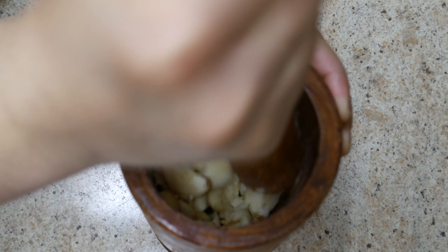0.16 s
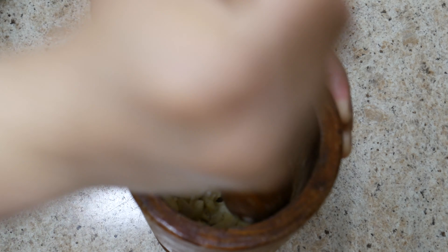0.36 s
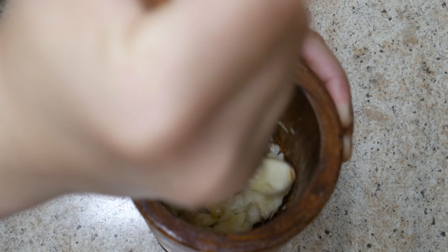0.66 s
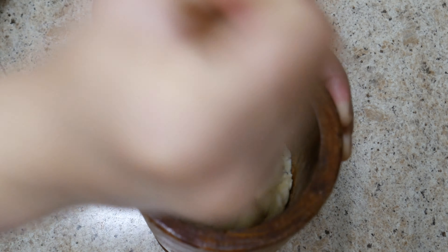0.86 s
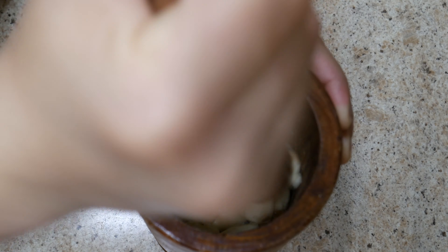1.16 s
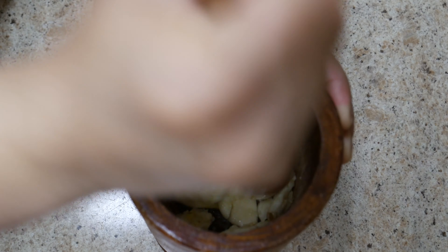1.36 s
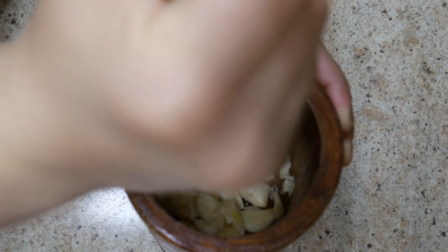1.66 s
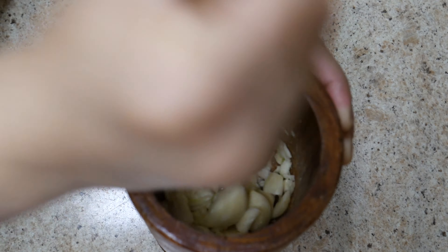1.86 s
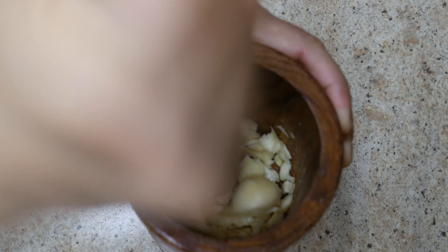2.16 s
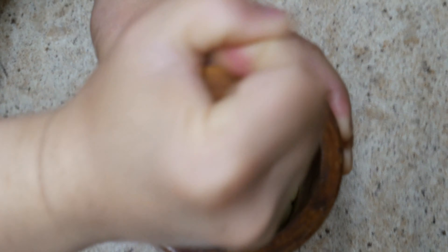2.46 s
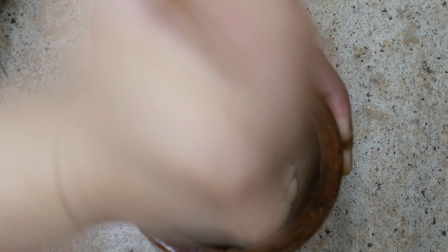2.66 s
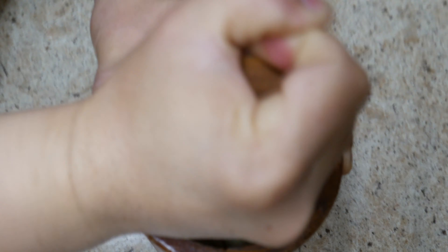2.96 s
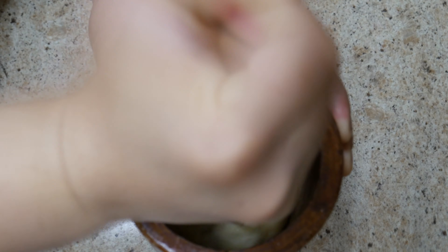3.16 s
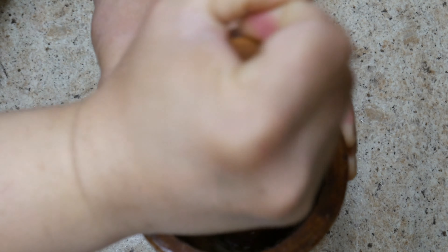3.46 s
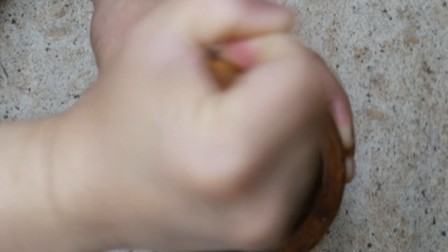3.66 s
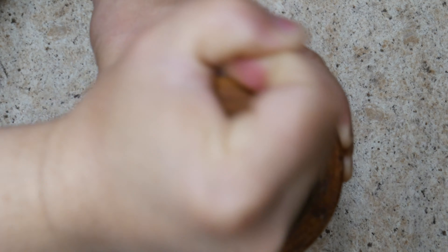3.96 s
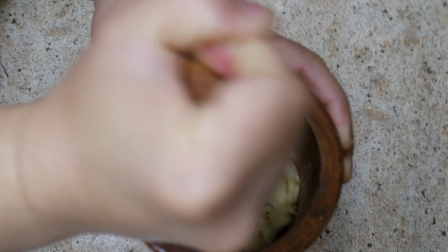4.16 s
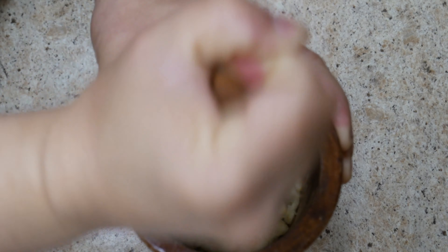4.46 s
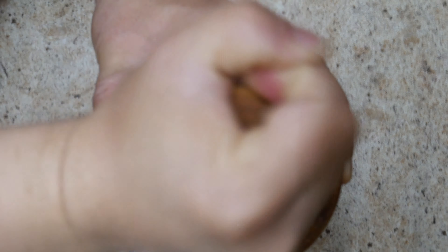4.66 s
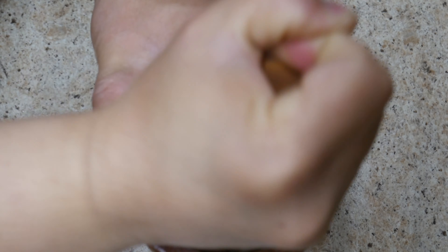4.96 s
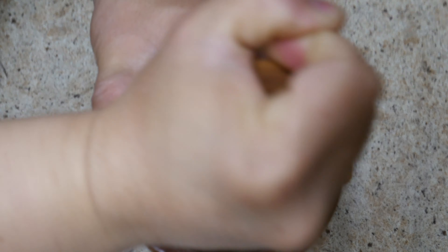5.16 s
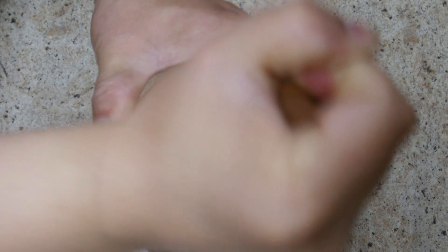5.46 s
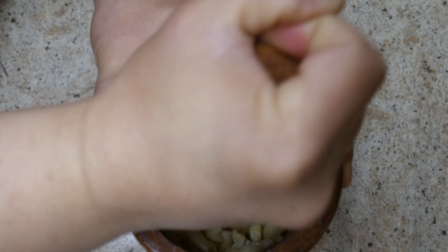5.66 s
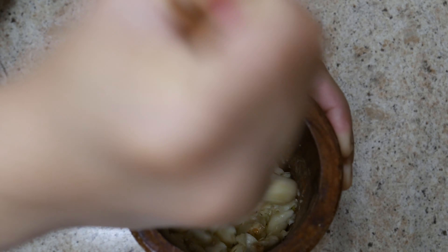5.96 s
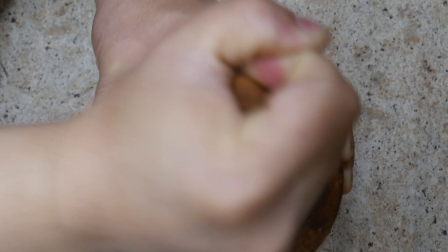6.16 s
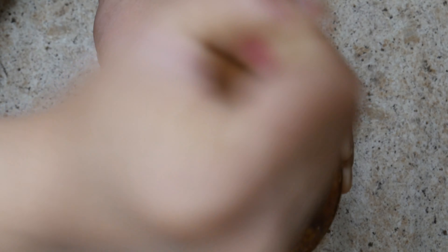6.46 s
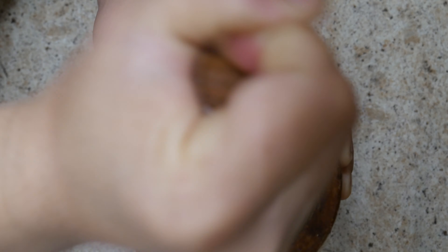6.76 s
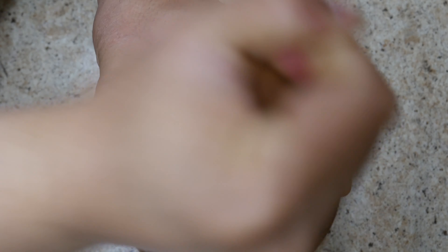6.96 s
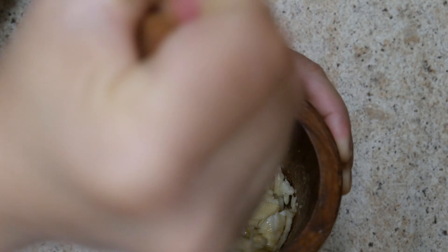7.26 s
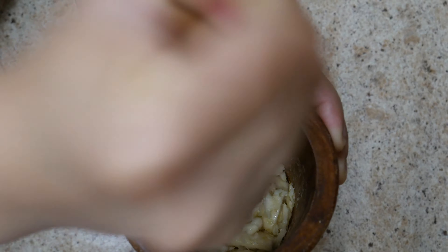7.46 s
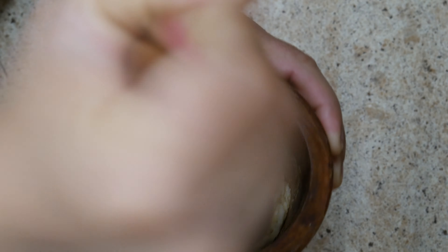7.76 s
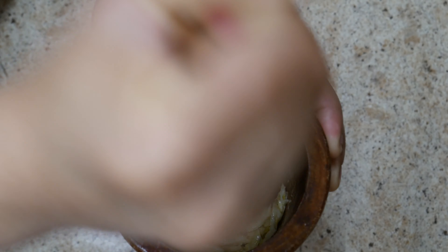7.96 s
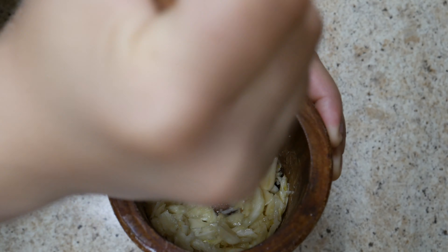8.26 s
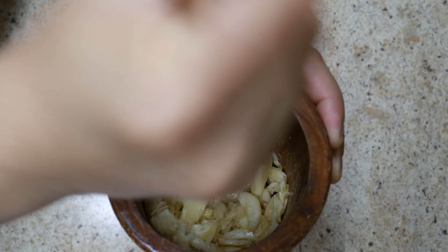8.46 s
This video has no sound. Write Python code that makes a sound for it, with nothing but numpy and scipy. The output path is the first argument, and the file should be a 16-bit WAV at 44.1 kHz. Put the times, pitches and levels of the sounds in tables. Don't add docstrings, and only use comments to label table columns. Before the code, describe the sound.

A wooden pestle pounds garlic in a wooden mortar, about four hard blows a second, crunching dry at first, then squelching wetly.

```python
import sys
import numpy as np
from scipy import signal
from scipy.fft import rfft, irfft
from scipy.io import wavfile
from scipy.ndimage import uniform_filter1d

SR = 44100
rng = np.random.default_rng(int(sys.argv[2]) if len(sys.argv) > 2 else 0)


def to_wav(s):
    ch = np.atleast_2d(s).T
    pcm = np.round(np.clip(ch, -1, 1) * 32767)
    wavfile.write(sys.argv[1], SR, pcm.astype(np.int16))


def to_linear_factor(level_db):
    exponent = np.asarray(level_db, float) / 20
    return 10 ** exponent


N = 379409
SPAN = np.arange(SR // 2) / SR


def add(track, s, piece, lead=0):
    at = int(s * SR) - lead + np.arange(len(piece))
    inside = (at >= 0) & (at < N)
    track[at[inside]] += piece[inside]


def ring(modes, push, db, scatter_db, detune):
    hz, mode_db, t60 = np.transpose(modes)[:, :, None]
    chance = rng.standard_normal((2, len(modes), 1))
    decay = to_linear_factor(mode_db + scatter_db * chance[1] - 60 * SPAN / t60)
    waves = np.sin(2 * np.pi * hz * (1 + detune * chance[0]) * SPAN) * decay
    sound = signal.fftconvolve(push, waves.sum(0))[:len(SPAN)]
    return to_linear_factor(db) * sound / np.abs(sound).max()


def resonate(x, peaks, order=1):
    y = 0
    for hz, width, db in peaks:
        b, a = signal.iirpeak(hz, hz / width, SR)
        y = y + to_linear_factor(db) * signal.sosfilt([[*b, *a]] * order, x)
    return y / y.std()


def colour(x, spectrum):
    hz, db = np.transpose(spectrum)
    f = np.log(np.arange(1, len(x) // 2 + 2) * SR / len(x))
    y = irfft(rfft(x) * to_linear_factor(np.interp(f, np.log(hz), db)), len(x))
    return y / y.std()


def grit(size, spread_db, grain_ms):
    k = max(int(grain_ms * SR / 1000), 1)
    strengths = to_linear_factor(spread_db * rng.exponential(size=size // k + 1))
    grains = np.repeat(strengths, k)[:size]
    return rng.standard_normal(size) * grains / np.sqrt(np.mean(grains ** 2))


def swell(rise_ms, fall_ms, lead, size=4096):
    ms = (np.arange(size) - lead) * 1000 / SR
    return to_linear_factor(-12 * np.where(ms < 0, -ms / rise_ms, ms / fall_ms))


# start_s [s], extra level_db [dB]
HOPS = [
    (.74, 4),
    (.99, 4),
    (1.74, 5),
    (4.42, 1.5),
    (6.11, 3),
    (7.1, 1.5),
    (7.58, 9),
    (8.57, 3),
]


def hop_db(s):
    return sum(db for at, db in HOPS if abs(at - s) < .05)


# frequency_hz [Hz], level_db [dB per Hz]
QUIET = [(12, -34), (20, 3.5), (45, -1.5), (168, -9.5), (499, -17), (574, -24.5), (1370, -33.5),
         (2080, -34.5), (8650, -44), (13500, -46), (16000, -65)]


def quiet_room():
    return to_linear_factor(-45) * colour(rng.standard_normal(N), QUIET)


# frequency_hz [Hz], level_db [dB], t60_s [s]
ROOM = [(120, -6.5, 0.42), (291, -3, 0.23), (454, -8, 0.48), (970, 0, 0.61), (2030, -20, 0.67),
        (3800, -6, 1), (8000, -11, 1), (13900, -8, 0.15)]
ROOM_MODAL_HZ = 700


def kitchen(x):
    out, paths = 0, 4
    turn = np.searchsorted(np.array(BLOWS)[:, 0] - .1, np.arange(N) / SR) % paths
    for path in range(paths):
        echo = 0
        for hz, db, t60 in [band for band in ROOM if band[0] < ROOM_MODAL_HZ]:
            tail = resonate(rng.standard_normal(len(SPAN)), [(hz, .7 * hz, 0)]) * to_linear_factor(-60 * SPAN / t60)
            onset = np.minimum(SPAN / 0.0015, 1)
            echo = echo + to_linear_factor(db) * np.sqrt(hz / SR) * tail * onset / np.sqrt(t60 * SR / 14)
        out = out + signal.oaconvolve(x * (turn == path), echo)[:N]
    haze = grit(N, .8, 2.5)
    thirds = [(hz * step, db, t60) for hz, db, t60 in ROOM if hz >= ROOM_MODAL_HZ for step in (.8, 1, 1.25)]
    for hz, db, t60 in thirds:
        keep = to_linear_factor(-120 / t60 / SR)
        band = signal.lfilter(*signal.iirpeak(hz, 6, SR), x)
        stored = signal.lfilter([1 - keep], [1, -keep], band ** 2)
        out = out + to_linear_factor(db - 9.0) * np.sqrt(stored) * resonate(haze, [(hz, hz / 4, 0)], order=2)
    return out


# frequency_hz [Hz], level_db [dB per Hz]
PASTE = [(590, -26), (1000, -11.5), (1610, -24), (1870, 1.5), (2470, -1.5), (4260, -2), (8750, -7.5),
         (14400, -20.5), (16000, -38.5)]
# frequency_hz [Hz], width_hz [Hz], level_db [dB]
HOLLOW = [(374, 347, 15.5), (610, 340, 3.5), (1010, 920, -15.5), (1945, 1300, -53)]
SQUELCH_DB, SQUELCH_PER_CRUNCH, DWELL_S = -45.5, 0.32, 0.14
WETTING_DB, WETTING_S = -2.5, 1.3
RATTLE_DB, RATTLE_PER_SLAP, RATTLE_PER_WALL = -31.5, 0.51, 0.19


def aftermath():
    wet, rattle = np.zeros(N), np.zeros(N)
    dwell = SPAN[SPAN < DWELL_S]
    release = np.minimum((dwell[-1] - dwell) / 0.044, 1)
    for blow, burst, contact in zip(BLOWS, CRUNCH, CONTACTS):
        s, _, slap_db, low_db, wall_db = blow
        paste_db = contact[-1] + SQUELCH_DB + SQUELCH_PER_CRUNCH * burst[1]
        paste_db += WETTING_DB * np.exp(-s / WETTING_S)
        rattle_db = RATTLE_DB + RATTLE_PER_SLAP * slap_db + RATTLE_PER_WALL * (low_db + wall_db)
        rattle_db += hop_db(s)
        squelch = to_linear_factor(paste_db + 5.0 - 60 * dwell) + to_linear_factor(paste_db + 18.5 - 990 * dwell)
        add(wet, s, squelch * release)
        add(rattle, s, to_linear_factor(rattle_db + 11.0 - 168.0 * SPAN) * np.minimum(SPAN / 0.0095, 1))
    squelching = colour(grit(N, 2.0, 1.2), PASTE) * wet
    return squelching + resonate(grit(N, 1.9, 3.0), HOLLOW, order=2) * rattle


# start_s [s], pitch_hz [Hz], level_db [dB], t60_s [s]
SINGS = [
    (1.49, 3600, -45, .45),
    (1.99, 2060, -43, .45),
    (3.2, 1950, -38, 0.38),
    (4.151, 1140, -28, 0.45),
    (6.86, 1930, -41, .4),
    (7.1, 760, -30, 0.59),
]


def sings():
    out = np.zeros(N)
    for s, hz, db, t60 in SINGS:
        blur = resonate(rng.standard_normal(len(SPAN)), [(hz, 70, 0), (hz * 0.94, 130, -5)], order=2)
        add(out, s, to_linear_factor(db - 2 - 60 * SPAN / t60) * blur)
    return out


# start_s [s], length_ms [ms], level_db [dB]
SQUEAKS = [
    (0.364, 36, -46),
    (5.125, 10, -55),
    (5.36, 13, -45),
    (3.404, 38, -27.5),
    (3.557, 23, -45),
    (5.599, 13, -32.5),
]
# start_s [s], length_ms [ms], level_db [dB]
WHISTLE = (.362, 37, -44.5)


def squeaks():
    rub, slip = np.zeros(N), np.zeros(N)
    for track, events in ((rub, SQUEAKS), (slip, [WHISTLE])):
        for s, ms, db in events:
            add(track, s, to_linear_factor(db) * signal.windows.tukey(int(ms * SR / 1000), .3))
    friction = grit(N, 2.2, 1.5)
    narrow = [(2290, 130, -2), (4880, 130, 0), (3900, 200, -8)]
    broad = [(2200, 320, 5.5), (4870, 360, 3), (5300, 1500, -3), (3920, 750, -4), (650, 420, 1),
             (6550, 4100, -15)]
    thin = resonate(rng.standard_normal(N), narrow, order=2) * slip
    return thin + resonate(friction, broad, order=2) * rub


# start_s [s], level_db [dB], centre_hz [Hz], length_ms [ms]
LIFTS = [(0.5475, -32.5, 4130, 19), (1.598, -41, 3760, 20), (1.826, -38.5, 5950, 8.2),
         (1.86, -44, 4170, 13), (2.356, -35, 2150, 14), (2.601, -36, 3540, 15), (3.095, -33, 4270, 17),
         (3.8044, -36, 3660, 16), (4.0586, -31, 2090, 10), (4.2547, -47, 3060, 14),
         (4.562, -34.5, 2170, 24), (5.1307, -47, 2240, 11), (5.955, -34.5, 3520, 17),
         (6.7318, -32, 3560, 8.8), (6.925, -32, 4350, 26), (7.2365, -39.5, 2090, 20),
         (7.6996, -33.5, 2040, 25), (7.735, -39, 3300, 10), (7.9194, -42, 3570, 13),
         (8.1635, -34.5, 2880, 14), (8.218, -35.5, 3540, 20), (8.471, -35.5, 3550, 15)]


def lifts():
    out = np.zeros(N)
    for s, db, hz, ms in LIFTS:
        peaks = [(hz, 900, 0), (2200, 900, -4), (5000, 7000, -6), (600, 700, -3)]
        smack = resonate(grit(4096, 1.2, 0.85), peaks, order=2)
        add(out, s, to_linear_factor(db - 10.0) * smack * swell(2.7, ms, 240), 256)
    return out


# start_s [s], level_db [dB],
# pitch_hz [Hz]
NUDGES = [
    (.31, -36, 700),
    (0.386, -24.5, 535),
    (5.134, -23, 520),
    (5.365, -25, 478),
    (3.434, -17, 490),
    (6.553, -30, 450),
    (7.06, -19, 650),
    (8.071, -33, 505),
]


def nudges():
    out = np.zeros(N)
    for s, db, hz in NUDGES:
        push = uniform_filter1d(grit(2048, 1.8, .6) * swell(5.1, 8.4, 280, size=2048), size=20)
        add(out, s, ring([(hz, 0, .04), (190, -4, .05), (800, -8, .03)], push, db, 1.5, 0.016), 256)
    return out


# start_s [s], bowl_db [dB], pestle_db and crack_db
# [dB above the bowl], level_db of the scrape that follows [dB]
KNOCKS = [(0.481, -17.5, -27, -5, -45), (0.973, -13.5, -21, -9.5, -36.5), (1.226, -17, -28, -13, -13),
          (1.977, -6.5, -20, -29, -37), (2.451, -20, -24, -18.5, -16), (2.693, -15.5, -29, -15, -17.5),
          (3.166, -17.5, 7.5, -13, -32.5), (3.357, -26, -11, -6, -24), (4.15, -4.5, 8.5, -4, -18),
          (4.365, -5, 1.5, -44, -16.5), (4.857, -10, -19, -34, -27), (5.062, -0.5, -7, -17.5, -26.5),
          (5.308, -3, -5.5, -14, -21), (5.526, -11, -6, -21, -16.5), (6.825, -20.5, 16, 8.5, -15),
          (7.029, -4.5, 2.5, -13.5, -18.5), (7.804, -34, 6, -8, -31), (8.278, -11, -3.5, -22, -24.5),
          (8.521, -10, 5, -15, -35)]
# frequency_hz [Hz], width_hz [Hz], level_db [dB]
CRACK = [(1950, 320, 14.5), (1644, 700, 18.5), (3120, 1860, 3), (4700, 2600, -7)]
TOUCH_LEAD_S, TOUCH_DB, TOUCH_PESTLE_DB, TOUCH_CRACK_DB, TOUCH_SCRAPE_DB = .014, -23.5, -29, -12, -34
TOUCH_DRY_DB, DRYING_S = 7.5, 3
KNOCK_RATTLE_DB, KNOCK_RATTLE_DB_PER_S = -23.5, 499


def knocks():
    out, slide, grind = np.zeros((3, N))
    landings = np.array(BLOWS)[:, 0]
    rim = np.array(KNOCKS)[:, 0]
    rim_modes = [(634, 0.0, 0.069), (252, -11, 0.12), (1160, -7, .03), (2200, -15, 0.014)] + BOWL_HIGH
    touches = []
    for s in landings[1:]:
        if not np.any((rim < s) & (rim > s - .12)):
            touch_db = TOUCH_DB + TOUCH_DRY_DB * np.exp(-s / DRYING_S)
            touches.append((s - TOUCH_LEAD_S, touch_db, TOUCH_PESTLE_DB, TOUCH_CRACK_DB, TOUCH_SCRAPE_DB))
    for s, db, pestle_db, crack_db, scrape_db in KNOCKS + touches:
        contact = grit(2048, 1.8, 0.59) + 4 * signal.unit_impulse(2048, 28)
        chatter = uniform_filter1d(contact * swell(0.5, 8, 28, size=2048), size=4)
        add(out, s, ring(rim_modes, chatter, db - 7.5, 3.1, 0.025), 32)
        add(out, s, ring(PESTLE, chatter, db + pestle_db - 7, 1.5, .015), 32)
        crack = resonate(chatter, CRACK, order=2)
        add(out, s, to_linear_factor(db + crack_db + 1.0) * crack / np.abs(crack).max(), 32)
        add(slide, s, to_linear_factor(db + KNOCK_RATTLE_DB - KNOCK_RATTLE_DB_PER_S * SPAN))
        way = landings[landings > s][0] - s
        to_go = 1 - SPAN[SPAN < way] / way
        add(slide, s, to_linear_factor(scrape_db - 7.5 - 10.0 * to_go))
        add(grind, s, to_linear_factor(scrape_db - 15.0 - 16.0 * to_go))
    body = [(620, 370, 5.5), (1025, 410, -5.0), (2240, 940, -11), (1455, 720, -16)]
    salt = [(4320, 2800, 8.5), (7800, 1700, 2.5)]
    rub = grit(N, 2.6, 2.5)
    return out + resonate(rub, body, order=2) * slide + resonate(rub, salt, order=2) * grind


# start_s of the peak [s], level_db [dB], tilt_db of low over high
# grit [dB], rise_ms [ms], fall_ms [ms]
CRUNCH_BURSTS = [(0.0092, -22, 10.5, 28, 9.1), (0.248, -17.5, -3.5, 2, 3.9), (0.4944, -21, 0, 4.5, 4.7),
                 (0.7389, -19, 9, 2.6, 8.3), (0.9834, -24, 7.5, 4.5, 7.1), (1.2419, -21.5, 9.5, 4.3, 7.6),
                 (1.4874, -12, -0.5, 2, 3.2), (1.736, -19, 4.5, 5, 4.6), (1.986, -13, 9.5, 4.3, 4.5),
                 (2.2263, -22.5, 0, 5.7, 11.4), (2.47, -20, -1.5, 4.6, 9), (2.7087, -16.5, 4.5, 3.7, 6.3),
                 (2.9552, -20.5, 4.5, 3.3, 10), (3.198, -16, 8.5, 3.8, 6), (3.4431, -20, 4.5, 24, 7.9),
                 (3.677, -15.5, -0.5, 3.5, 8.4), (3.925, -17.5, 3.5, 6, 9.8), (4.1749, -25.5, 3, 9.7, 14),
                 (4.4207, -15.5, 3.4, 2.9, 2.8), (4.6694, -16, 1.5, 6.3, 6.1), (4.911, -18, 9.9, 5.7, 7.7),
                (5.158, -16, 8.5, 2.4, 8.4), (5.3955, -16.5, 9, 3.8, 3.8), (5.632, -21, 1.2, 16, 9.8),
                (5.869, -22, 0.5, 12.3, 6.6), (6.1041, -14, 4.8, 4, 1.5), (6.3475, -11.5, 4, 1.7, 2.9),
                (6.6008, -14.5, 8.9, 2.3, 3.1), (6.86, -13.5, 8.2, 1.7, 3.4),
                (7.0973, -19.5, 5.5, 5.7, 8.5), (7.3422, -18.5, 8.2, 5.4, 8.5),
                (7.5827, -8.5, 5.6, 2, 0.46), (7.8388, -24.5, 6.3, 9.7, 13), (8.0864, -20.5, 9.1, 2, 12.4),
                (8.3396, -16.5, 3.9, 1.9, 6.6), (8.5687, -19, 3.5, 4.1, 6.3)]
CRUNCH = CRUNCH_BURSTS
# frequency_hz [Hz], width_hz [Hz], level_db [dB]
GRIT = [
    [(2088, 640, 6.5), (2660, 1450, 1.5), (1576, 1700, -4.5)],
    [(3750, 600, -9), (4320, 1000, -1.5), (4920, 2800, -8)],
    [(8150, 2550, 2), (7650, 2400, -12.5), (11350, 5500, -5)],
]


def crunch():
    out, lead = np.zeros(N), 2048
    for s, burst_db, tilt_db, rise_ms, fall_ms in CRUNCH:
        band_db = burst_db + np.array([tilt_db / 2, -0.3, -tilt_db / 2])
        shape = swell(rise_ms, fall_ms, lead) + to_linear_factor(-32.5) * swell(4.4, 28.0, lead)
        common = grit(4096, 1.1, .4)
        for peaks, db in zip(GRIT, band_db):
            shifted = []
            for (hz, width, peak_db), (u, v) in zip(peaks, rng.standard_normal((3, 2))):
                shifted.append((hz * (1 + 0.053 * u), width, peak_db + 2.0 * v))
            clumps = common + 1.3 * grit(4096, 3.2, 2.5)
            band = resonate(clumps * shape, shifted, order=2)
            loudest = np.sqrt(uniform_filter1d(band ** 2, size=100).max())
            add(out, s, to_linear_factor(db - 2.5) * band / loudest, lead)
    return out


# start_s [s], thud_db of the counter [dB], slap_db on the bottom [dB],
# low_db of the bowl ring [dB], wall_db of the wall ring [dB above the bowl ring]
PESTLE_BLOWS = [(0.0073, -32, -16, -18, -1), (0.2494, -18.5, -9.5, -15, -11), (0.4961, -17, -7.5, -16, -4.5),
                (0.7408, -17.5, -11, -15.5, -6), (0.9887, -18.5, -10, -11, -6.5),
                (1.244, -22, -9.5, -20, -2.5), (1.4884, -23, -17, -22.5, 0.5), (1.7383, -23, -10.5, -14, -6),
                (1.9847, -22, -19.5, -21, -4), (2.228, -15.5, -19.5, -14.5, -13),
                (2.4708, -16, -11.5, -17.5, -3.5), (2.7108, -20.5, -16.5, -13, -5),
                (2.9612, -15.5, -16, -17, -2.5), (3.2014, -28, -31, -18.5, -2),
                (3.4388, -24, -26, -11, -14.5), (3.678, -17.5, -19, -17.5, -5.5),
                (3.9276, -17.5, -18.5, -11, -16), (4.1765, -23.5, -21, -22, -12),
                (4.422, -14.5, -10, -9.5, -3.5), (4.672, -15, -22, -21, -0.5),
               (4.9136, -20, -9.5, -11.5, -18), (5.1611, -15.5, -13.5, -19, -4),
               (5.3976, -16, -16.5, -14.5, -5), (5.6321, -17, -21.5, -18, -3),
               (5.8673, -12.5, -13.5, -14, -12.5), (6.1054, -15, -6.5, -21.5, 5.5),
               (6.3489, -17, -24, -9.5, -4.5), (6.6016, -20, -15.5, -12.5, -11),
               (6.862, -17, -12, -14.5, 1.5), (7.0994, -20.5, -11, -15, 5.5), (7.344, -20, -17, -18, -11),
               (7.5839, -15, -6, -20, 5.5), (7.842, -20.5, -26, -21, -4.5), (8.0895, -15, -9.5, -18, 2.5),
               (8.3427, -15.5, -14.5, -23, 0), (8.5711, -16, -8, -19, -2)]
BLOWS = PESTLE_BLOWS
# start_s [s], grip_hz [Hz], wall_hz [Hz], chatter_ms [ms],
# level_db added to the squelch after it [dB]
CONTACTS = [(.007, 471, 660, 11, 3.5), (.249, 463, 600, 3, 0.5), (.496, 414, 740, 14, 0.5),
            (.741, 441, 638, 8.2, -1), (.989, 438, 595, 7.2, -2), (1.244, 453, 680, 6.7, 0.5),
            (1.488, 553, 656, 6.2, 3.5), (1.738, 475, 727, 9.1, -1.5), (1.985, 470, 690, 9.1, 2),
            (2.228, 496, 703, 7.7, 3), (2.471, 458, 687, 11, 1), (2.711, 446, 666, 7, 2),
            (2.961, 453, 666, 9.2, 2.5), (3.201, 487, 673, 12.2, 1), (3.439, 477, 673, 15.5, 6),
            (3.678, 413, 662, 11, 4), (3.928, 423, 620, 6.7, 2.5), (4.177, 495, 713, 11, -1),
            (4.422, 503, 620, 4, 1.5), (4.672, 431, 659, 6.5, 3.5), (4.915, 485, 620, 6.5, 2.5),
            (5.161, 422, 665, 11.6, 4.5), (5.397, 480, 660, 10.7, 2.5), (5.633, 480, 654, 6.5, 3.5),
            (5.868, 402, 616, 9.6, 3), (6.106, 400, 675, 11.3, 1.5), (6.349, 516, 630, 2.6, 1),
            (6.601, 455, 620, 5.1, 1.5), (6.863, 410, 654, 4.1, -4), (7.1, 470, 640, 6.6, -8),
            (7.344, 484, 620, 6, 3), (7.585, 450, 650, 4.9, -4), (7.841, 476, 670, 7.6, 1),
            (8.089, 460, 636, 5.2, 0), (8.343, 460, 685, 6.3, 1.5), (8.571, 400, 750, 14.4, -1)]
# pitch_hz [Hz], level_db [dB], t60_s [s]
COUNTER = [(71.3, -3, 0.097), (88.6, -7, 0.19), (95.2, -1, 0.28), (113.6, -13, 0.24), (143.7, -14.5, 0.24)]
SWAY = [(12.9, 10, 0.6), (20.2, 14, 0.35), (38.46, 9, 0.76)]
SLAP = [(237.5, 5.5, 0.04), (209.4, -13.5, 0.21), (290, -14, 0.19), (322.7, -20.5, 0.38)]
BOWL_LOW = [(480.7, -13.5, 0.1), (461.6, -16.5, 0.11), (352, -26.5, 0.28)]
BOWL_HIGH = [(669.8, 0, 0.078), (590, -38.5, 0.021), (780, -10.5, 0.13)]
PESTLE = [(1060, -14, 0.05), (1004, 15, 0.0038), (1434, -23, 0.0071), (1230, -32, 0.15)]
PESTLE_DB, PESTLE_PER_SLAP, PESTLE_PER_HOP = -12.5, 2.03, 2.15


def blows():
    heavy, wood, lead = np.zeros(N), np.zeros(N), 512
    push = np.hanning(int(0.0049 * SR))
    hop = np.concatenate([push, np.zeros(int(0.01037 * SR)), 0.95 * push])
    arm = np.hanning(int(0.0077 * SR))
    slap = np.diff(np.hanning(int(0.0031 * SR)))
    detune = np.array([[0.0058], [.016], [.02], [.02]])
    for (s, thud_db, slap_db, low_db, wall_db), (_, grip_hz, wall_hz, ms, _) in zip(BLOWS, CONTACTS):
        pestle_db = PESTLE_DB + PESTLE_PER_SLAP * slap_db + PESTLE_PER_HOP * hop_db(s)
        add(heavy, s - .0045, -ring(COUNTER, hop, thud_db + 6.0, 0.4, 0.053))
        add(heavy, s, ring(SWAY, arm, .5 * thud_db - 9.0, 0.42, 0.023))
        add(wood, s - .0032, ring(SLAP, slap, slap_db + 3.0, 3.2, 0.0447))
        low = [(grip_hz, 0, .035)] + BOWL_LOW
        high = [(wall_hz, 0, .035)] + BOWL_HIGH
        for modes, db in ((low, low_db), (high, low_db + wall_db), (PESTLE, pestle_db)):
            chatter = grit(4096, 2.02, 0.76) * swell(0.57 * ms, ms, lead)
            add(wood, s, ring(modes, chatter, db + 7.5, 2.2, detune), lead)
    return heavy, wood


def scene():
    heavy, wood = blows()
    near = wood + knocks() + nudges()
    inside = crunch() + lifts() + squeaks()
    echo = kitchen(to_linear_factor(-5) * (near + inside) + to_linear_factor(-24) * heavy)
    mono = heavy + near + inside + aftermath() + echo + quiet_room() + sings()
    return np.array([mono, mono])


SPARSE_HZ, SPARSE_FLOOR_DB, SPARSE_SHARE, SPARSE_DROP_DB = 9600, -91, 0.93, -5.5


def sparse(x):
    hz, _, z = signal.stft(x, SR, nperseg=1024)
    size = np.abs(z)
    threshold = to_linear_factor(SPARSE_FLOOR_DB) + SPARSE_SHARE * uniform_filter1d(size, size=16, axis=0)
    weak = (size < threshold) & (hz[:, None] > SPARSE_HZ)
    return signal.istft(z * np.where(weak, to_linear_factor(SPARSE_DROP_DB), 1), SR, nperseg=1024)[1][:N]


def band_limit(x):
    return signal.sosfilt(signal.butter(12, 16500, fs=SR, output="sos"), x)


def record(dry):
    low_pass = signal.ellip(8, .5, 60, 15900, fs=SR, output="sos")
    sound = signal.sosfilt(low_pass, np.tanh(dry) / 0.97)
    sound = np.array([sparse(sound[0])] * 2)
    flicker = uniform_filter1d(rng.standard_normal(N), size=300)
    side = to_linear_factor(1) * flicker * signal.lfilter([1, -.91], [1, -.5], sound[0])
    return band_limit(sound + side * np.array([[1], [-1]]))


dry = scene()
out = record(dry)
to_wav(out)
```